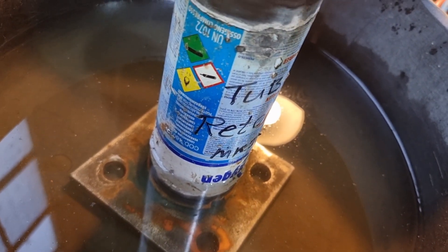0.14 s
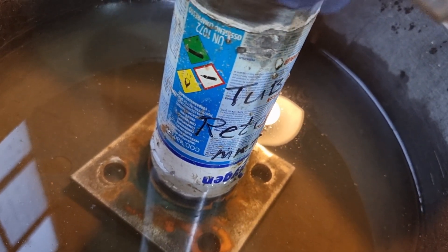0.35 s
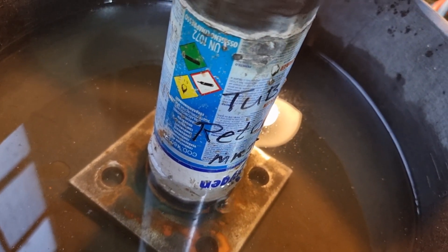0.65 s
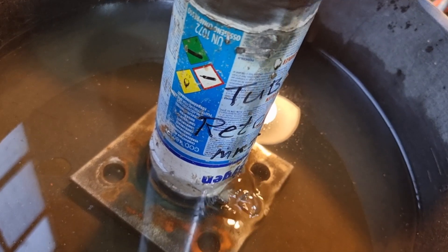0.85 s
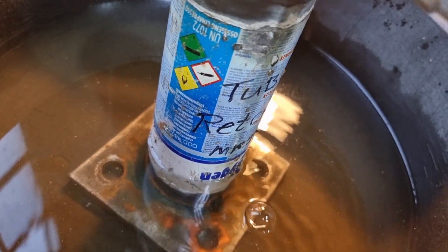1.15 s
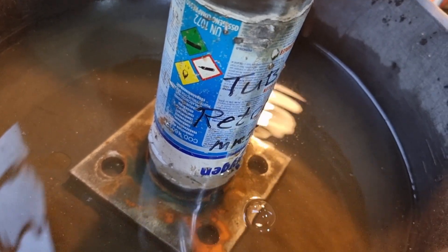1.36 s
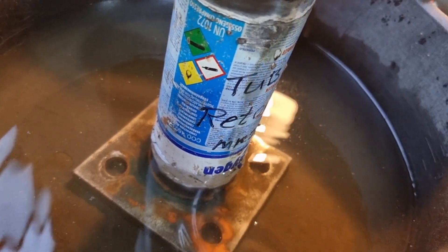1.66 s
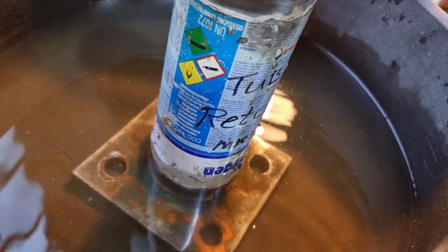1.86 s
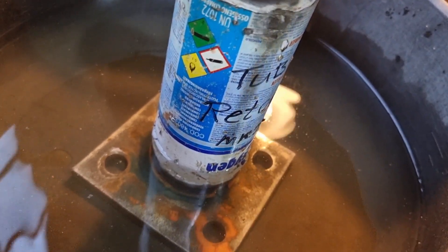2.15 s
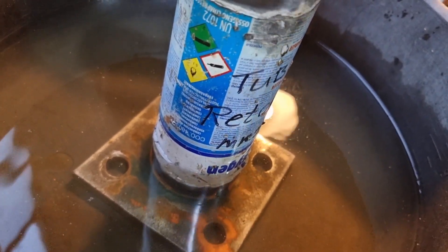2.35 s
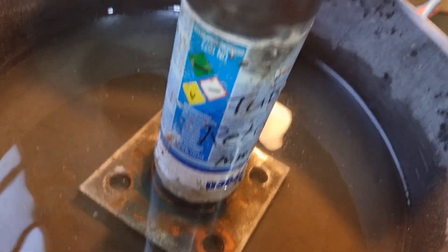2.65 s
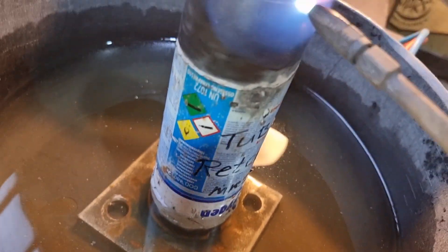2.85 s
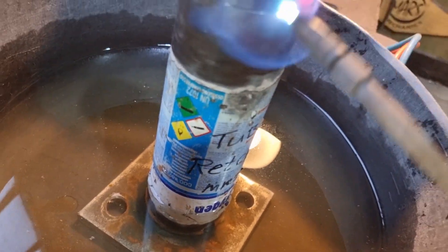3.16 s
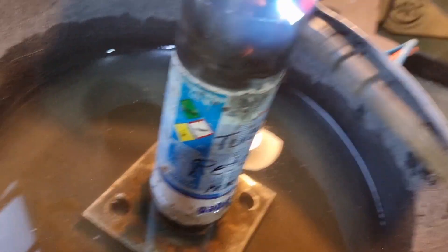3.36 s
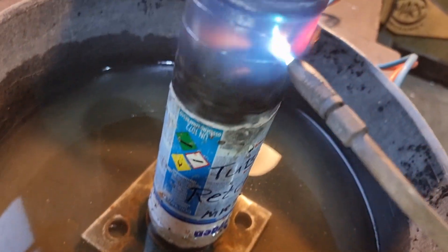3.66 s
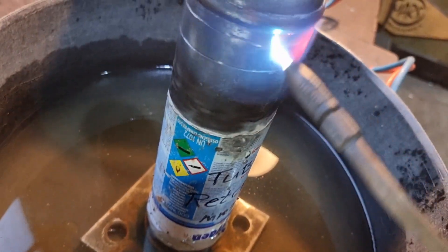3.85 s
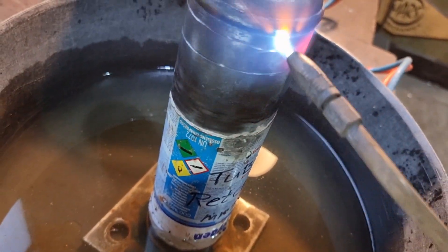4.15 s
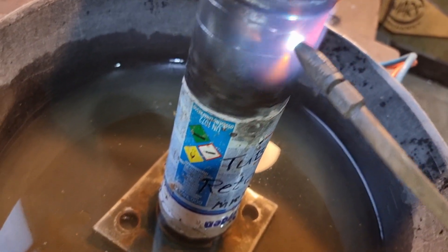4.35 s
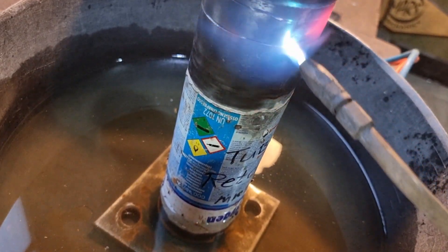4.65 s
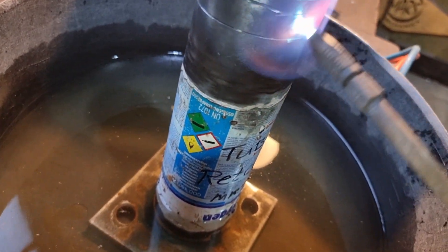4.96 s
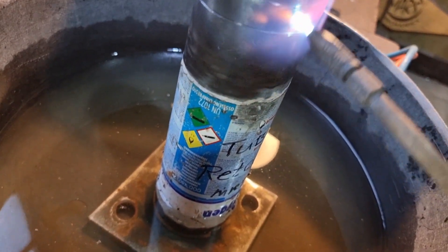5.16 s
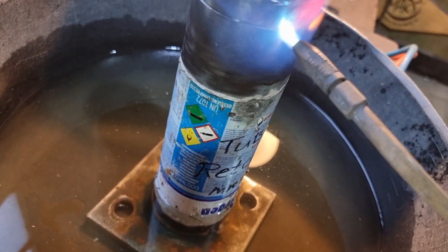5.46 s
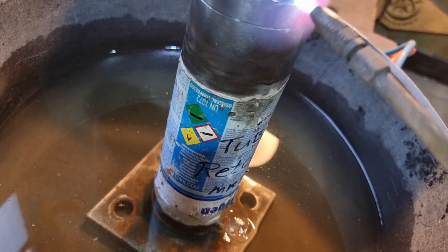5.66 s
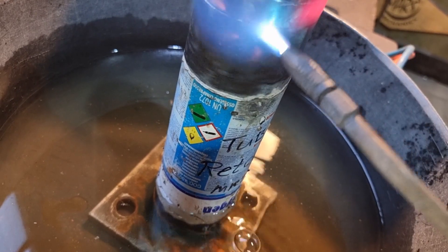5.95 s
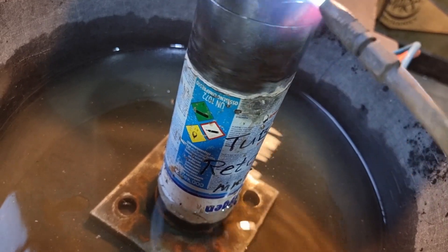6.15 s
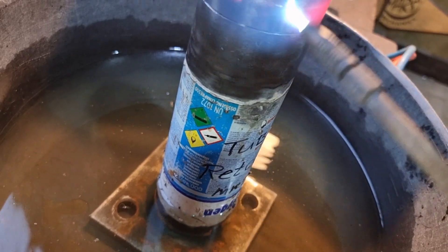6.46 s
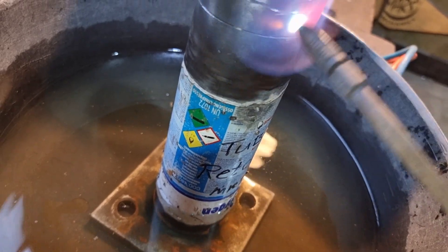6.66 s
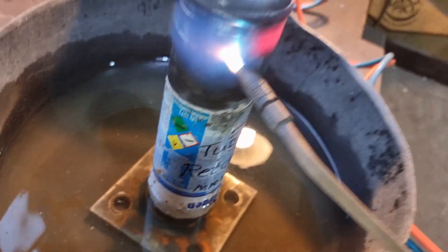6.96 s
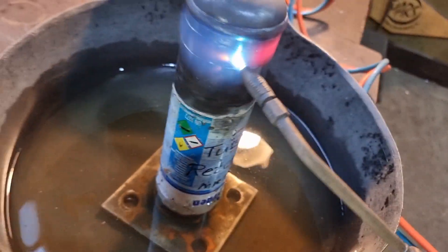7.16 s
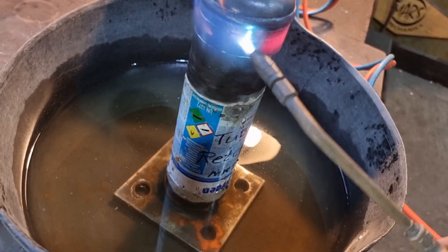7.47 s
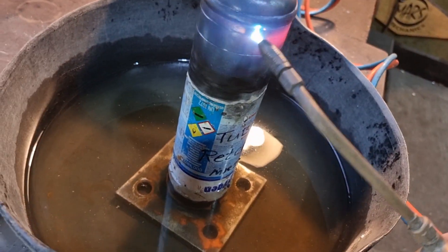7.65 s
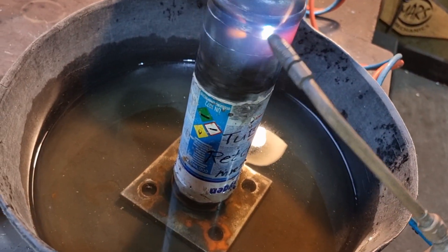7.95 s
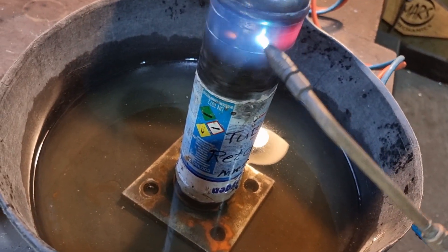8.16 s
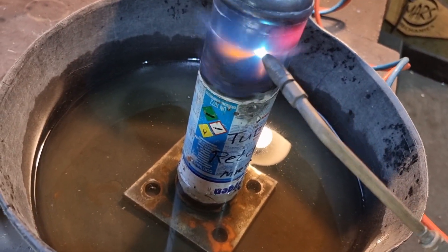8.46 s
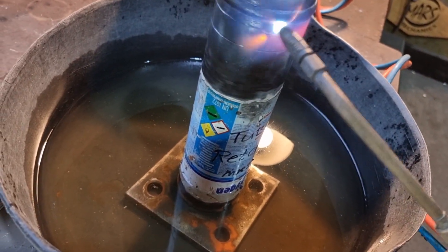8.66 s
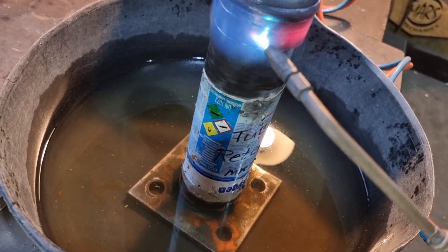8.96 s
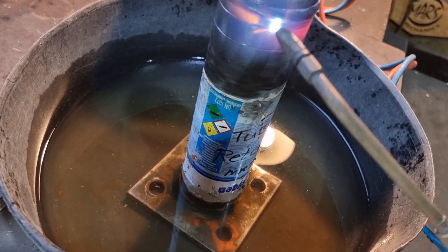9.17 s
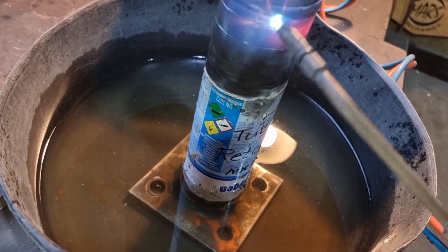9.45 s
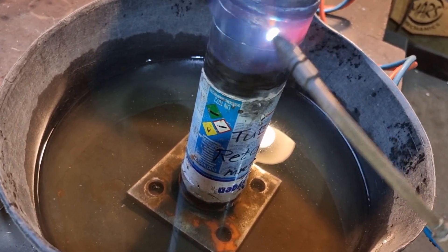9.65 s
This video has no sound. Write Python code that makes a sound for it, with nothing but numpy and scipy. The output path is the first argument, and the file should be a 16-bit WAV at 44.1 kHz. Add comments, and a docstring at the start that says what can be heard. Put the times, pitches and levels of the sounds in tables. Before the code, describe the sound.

Bright, gusty torch flame sweeps back and forth across metal, its piercing hiss swelling and sinking, interrupted once by a sharp double backfire.

```python
"""First comes a gas torch's roar, an arm's length from a phone's two microphones, sweeping over a steel tube
that stands in a tub of water. Flickering noise bands make its roar, gusty whistle and hiss, which mostly sink at
each turn of the hand. A short squeal glides up; a double backfire is gated noise with sharp bangs.
Two close echoes and a spray of short ones colour the torch. Behind it lie a fading rumble, a murmur of the
surroundings, faint sine hums and soft thumps."""
import sys
import numpy as np
from scipy import signal
from scipy.fft import rfft, irfft, next_fast_len
from scipy.io import wavfile
from scipy.ndimage import uniform_filter1d, minimum_filter1d, map_coordinates

SR = 44100
rng = np.random.default_rng(int(sys.argv[2]) if len(sys.argv) > 2 else 0)


def wav_record(signal):
    """Record a signal, one row per channel, as 16-bit PCM in the file named by sys.argv[1]."""
    frames = np.transpose(np.atleast_2d(signal))
    bounded = np.clip(frames, -1, 1)
    # unit amplitude maps onto the largest positive 16-bit level
    quanta = np.round(bounded * 32767).astype(np.int16)
    wavfile.write(sys.argv[1], SR, quanta)


N = 432621  # samples, 9.81 s

# Colour of the roar: (frequency [Hz], relative level [dB per Hz])
ROAR_COLOUR = [(300, -31), (860, -23.5), (1350, -17), (1850, -13), (2060, -19.5), (2350, -8), (3500, -6.5),
               (5000, -1.5), (6000, 2.5), (7500, -24), (9000, -61)]
UPPER_HZ = 4330  # where the upper roar begins


def roar(flutter, sputter):
    """Broad turbulence noise of the flame, parted into a lower and an upper roar."""
    whole = noise(ROAR_COLOUR, 2.57, 40., slow_db=0.7, count=9, channels=3)
    whole = unit(whole * undb(0.28 * flutter + 0.17 * sputter))
    lower = filtered(whole, 2, UPPER_HZ)
    return lower, whole - lower


# Colour of the whistling band: (frequency [Hz], relative level [dB per Hz])
WHISTLE_COLOUR = [(5900, -12), (6600, 1), (7600, 2.5), (8300, 3.5), (10000, -10)]
# Three ridges in the whistle, by how the nozzle points: (time [s], low [dB], middle [dB], high [dB])
RIDGE_LEVELS = [(0, 1, -2.5, 2), (3.3, -5, -7.5, -0.5), (3.75, -1.5, -9, -18), (4.1, -5, -7.5, -19),
                (5, -5, -5, -5), (6.9, -2.5, -7, -13.5), (7.4, -10, -1, -10), (9.81, -5.5, 0.5, 3)]
# Mean pitch of the low, middle and high ridge: (frequency [Hz])
RIDGE_PITCHES = (6876, 7530, 8000)
RIDGE_WANDER_HZ, RIDGE_WANDER_RATE, RIDGE_WIDTH_HZ = 110, 6, 620  # spread, turns a second, noise rate


def whistle(flutter, sputter):
    """A sputtering band of noise, with three wandering narrow ridges in the core of the flame."""
    band = noise(WHISTLE_COLOUR, 3.3, 70., count=3, channels=3)
    for hz, db in zip(RIDGE_PITCHES, curves(RIDGE_LEVELS)):
        level = undb(db + 3.8 * walk(110))
        wandering_hz = hz + RIDGE_WANDER_HZ * walk(RIDGE_WANDER_RATE)
        band[0] += level * narrow(wandering_hz, RIDGE_WIDTH_HZ)
    # gusts of a few milliseconds
    return unit(band * undb(0.6 * flutter + 1.2 * sputter + 1.76 * walk(150)))


# Colour of the hiss: (frequency [Hz], relative level [dB per Hz])
HISS_COLOUR = [(6000, -46), (8500, -20), (9700, -5), (11200, -4), (12700, 2), (14000, 1), (15500, 2.5),
               (17000, -21)]


def hiss(flutter, sputter):
    """High noise of the escaping gas, flickering in three bands."""
    bands = noise(HISS_COLOUR, 1.3, 85., slow_db=2.5, count=3, channels=3)
    return unit(bands * undb(.5 * flutter + 0.093 * sputter + 1.0 * walk(150)))


# Coming back onto the tube in a wide sweep: (middle time [s], level at the top of the flare [dB])
FLARE_TIMES = [(0.03, -28), (0.421, -20), (0.86, -21), (1.31, -18), (1.771, -22), (2.18, -27), (2.64, -30),
               (4.34, -23)]
FLARE_S, FLARE_HZ, FLARE_GLIDE_HZ, FLARE_WIDTH_HZ = 0.105, 11320, 1990, 2700


def flares():
    """Brief flares of hiss: a narrow noise band that swells while gliding up."""
    strength = sum(undb(db) * swell(s, FLARE_S) for s, db in FLARE_TIMES)
    glide = sum(span(s - FLARE_S / 2, FLARE_S, lambda u: u - .5) for s, _ in FLARE_TIMES)
    return strength * unit(narrow(FLARE_HZ + FLARE_GLIDE_HZ * glide, FLARE_WIDTH_HZ))


# The flame full on the tube: (time [s], roar level [dB], whistle level [dB], hiss level [dB])
FLAME_LEVELS = [(0.0, -31.5, -26, -17), (1.4, -26.5, -17, -19.5), (3.0, -33, -21.5, -17),
                (3.4, -29.5, -21, -18.5), (5.5, -29.5, -19.5, -16), (7.0, -26.5, -16.5, -22),
                (9.81, -27.5, -23, -17.5)]
# Turns of the hand, with how far each part sinks (negative: rises):
# (middle time [s], length [s], roar [dB], whistle [dB], hiss [dB])
HAND_TURNS = [(0.281, 0.66, 5, 7, 6.5), (0.722, 0.52, 8, 10.5, 3), (1.191, 0.52, 6.5, 12, 3),
              (1.61, 0.54, 11, 15, 5), (2.067, 0.43, 14.5, 16, 11.5), (2.453, 0.46, 11.5, 13.5, 13.5),
              (2.848, 0.33, 13.5, 15.5, 11.5), (3.179, 0.23, 7.5, 9.5, 3.5), (3.416, 0.58, -1.5, -3, 4),
              (3.84, 0.42, -1, 1, 5), (4.139, 0.48, -1, -1.5, 4.5), (4.44, 0.5, 8.5, 9, 4),
              (4.88, 0.45, 0.2, -0.5, 11), (5.382, 0.23, -1, -1, 8.5), (5.709, 0.48, -2, 2, 4),
              (6.148, 0.55, -2, 3, 6.5), (6.552, 0.34, -1.5, 6, 2), (6.755, 0.24, 10.5, 9, -1),
              (7.152, 0.57, 2.5, 5.5, 0), (7.466, 0.41, 2.5, 6, -0.5), (7.766, 0.66, 2, 3, -1.5),
              (8.061, 0.31, 11.5, 8.5, 0), (8.467, 0.48, 11.5, 11.5, 1), (8.825, 0.44, 16, 12, 4.5),
              (9.299, 0.35, 9, 8.5, 1.5), (9.714, 0.41, 11.5, 8, 3.5)]
HISS_LEAD_S = 0.023  # the hiss sinks a little before the roar
UPPER_LENGTH_SHARE, UPPER_LATE_S = 0.98, 0.012  # the upper roar turns more briefly and a little later


def sweeps():
    """Levels in dB of lower roar, upper roar, whistle and hiss as the hand sweeps and turns."""
    lower_level, whistle_level, hiss_level = curves(FLAME_LEVELS)
    upper_level = lower_level
    for middle, length, roar_db, whistle_db, hiss_db in HAND_TURNS:
        away = dip(middle, length)
        lower_level = lower_level - roar_db * away
        whistle_level = whistle_level - whistle_db * away
        upper_level = upper_level - roar_db * dip(middle + UPPER_LATE_S, UPPER_LENGTH_SHARE * length)
        hiss_level = hiss_level - hiss_db * dip(middle - HISS_LEAD_S, length)
    return lower_level, upper_level, whistle_level, hiss_level


FIRM, RETURN_SHARE = 0.64, 0.48  # flatness of the dip; share of its length that the way back takes


def dip(middle, length):
    """A turn of the hand from 0 to 1 and back: flattened in the middle, the way back of its own length."""
    def shape(u):
        bent = np.interp(u, [0, 1 - RETURN_SHARE, 1], [0, .5, 1])
        return np.tanh(FIRM * np.sin(np.pi * bent) ** 2) / np.tanh(FIRM)
    return span(middle - length / 2, length, shape)


# The jet choked around the backfire: (time [s], roar change [dB], whistle change [dB], hiss change [dB])
CHOKE_LEVELS = [(4.47, 0, 0, 0), (4.52, -3, -6, -8), (4.547, -5, -8, -11), (4.551, -6, -12, -24),
                (4.575, -6, -12, -22), (4.612, -8, -16, -14), (4.64, -9, -18, -7), (4.66, -6, -11, -5),
                (4.71, 0, 0, 0)]
# Gas spread round the tube, unrelated at the two microphones, against the core:
# (lower roar [dB], upper roar [dB], whistle [dB], hiss [dB])
SPREAD_LEVELS = (-8.5, -8.5, -5, -4.5)


def jet():
    """Rows: the core of the flame, then the gas spread round the tube at the left and right microphone."""
    flutter, sputter = walk(95), walk(170)  # shared by all parts
    parts = *roar(flutter, sputter), whistle(flutter, sputter), hiss(flutter, sputter)
    choke = curves(CHOKE_LEVELS)
    choke = choke[:1] + choke  # both roars share a column
    flame = 0
    for part, level_db, choke_db, spread_db in zip(parts, sweeps(), choke, SPREAD_LEVELS):
        flame = flame + part * undb(level_db + choke_db) * undb([[0], [spread_db], [spread_db]])
    flame[0] += flares()
    return flame


# Spans of crackling burn, levels before the crackle:
# (start time [s], length [s], burn level [dB], sizzle level [dB])
BACKFIRE_SPANS = [(4.522, .013, -35, -36), (4.5362, .002, -9, -14), (4.538, .007, -22, -19),
                  (4.546, .003, -25, -12), (4.549, .003, -33, -34), (4.556, .018, -37, -42),
                  (4.572, .006, -30, -32), (4.578, .006, -20, -21), (4.5845, .004, -13, -11),
                  (4.5885, .007, -17, -14), (4.595, .012, -11, -14), (4.608, .002, -18, -24),
                  (4.61, .005, -26, -30), (4.615, .008, -34, -42)]
# Colour of the burn: (frequency [Hz], relative level [dB per Hz])
BURN_COLOUR = [(300, -16), (700, -18), (1400, -7), (3000, 0.5), (6500, -0.5), (9000, -7), (17000, -4.5)]
# Colour of the sizzle: (frequency [Hz], relative level [dB per Hz])
SIZZLE_COLOUR = [(3000, -30), (4500, -3), (7000, 9), (9700, -8), (12700, -1), (15500, -2), (17000, -10)]
# Bangs within the backfire: (start time [s], frequency [Hz], length [cycles], level [dB])
BANGS = [(4.5364, 1400, 2.2, -10), (4.5366, 5000, 2, -7), (4.537, 7500, 3, -10), (4.5852, 3000, 1.5, -7),
         (4.588, 700, 1.5, -26), (4.6018, 3000, 1.5, -7), (4.608, 1400, 1.7, -13), (4.6086, 4000, 1.2, -7)]


def backfire():
    """Ragged flat-topped bursts of burning noise, with bangs that are short swings of pressure."""
    gate = 0
    for start, length, *db in BACKFIRE_SPANS:
        whole = length + .01  # room for the decay

        def burst(u):
            rise = np.clip(u * whole / .0004, 0, 1)
            return rise * np.exp(-np.clip(u * whole - length, 0, 1) / .001)
        gate = np.maximum(gate, undb(db)[:, None] * span(start, whole, burst))
    burn = gate[0] * noise(BURN_COLOUR, 1.5, 150., count=2)[0] + gate[1] * noise(SIZZLE_COLOUR)[0]
    bangs = 0
    for start, hz, cycles, db in BANGS:
        def swings(u):
            return np.sin(2 * np.pi * cycles * u) * np.sin(np.pi * u) ** 2
        bangs = bangs + undb(db) * span(start, cycles / hz, swings)
    crackle = undb(4.5 * walk(2500) - 2)
    return burn * crackle + bangs


# A short rising squeal of the jet: (start time [s], length [s], from [Hz], to [Hz], level [dB])
JET_SQUEAL = (2.443, .03, 7400, 7900, -19)


def squeal():
    """A sine that swells and fades while its pitch glides up."""
    start, length, hz0, hz1, db = JET_SQUEAL

    def glide(u):
        cycles = length * (hz0 * u + (hz1 - hz0) * u ** 2 / 2)
        return np.sin(np.pi * u) ** 2 * np.sin(2 * np.pi * cycles)
    return undb(db) * span(start, length, glide)


# Where the torch is, and its two echoes before their wavering: (time [s], left leads by [ms],
# left minus right [dB], near echo delay [ms], its level [dB], far echo delay [ms], its level [dB])
TORCH_PLACE = [(0, 0.068, 1, 0.71, -7, 2.4, -31), (3.3, 0.08, 2.5, 0.72, -10.5, 0.88, -21),
               (3.9, 0.083, 2.5, 0.93, -10, 1.35, -39), (4.5, 0.083, 1.5, 0.8, -8, 1.45, -7),
               (5, 0.053, 2, 0.84, -12, 1.52, -12), (6.8, 0.081, 2.5, 0.814, -17, 1.39, -35),
               (7.4, 0.039, 1.5, 0.61, -21, 1.3, -40), (9.81, 0.04, 2.1, 0.77, -21, 1.46, -25)]
ECHO_TOP_HZ = 11800
TUB_DB, BACKFIRE_TUB_DB = -5, -13  # echo spray; what the outbursts send into it


def space(flame, bursts):
    """Two close, duller echoes comb the core of the flame; their paths waver with the hand."""
    lead, pan_db, near, near_db, far, far_db = curves(TORCH_PLACE)
    core, ports = flame[0] + bursts, []
    dull = filtered(core, 1, ECHO_TOP_HZ)
    near, far = near + 0.022 * walk(4.01), far + 0.062 * walk(4.8)
    for side, spread in zip((1, -1), flame[1:]):  # left, right
        direct_ms = .1 - side * lead / 2
        near_echo = undb(near_db) * late(dull, direct_ms + near + side * 0.016)
        far_echo = undb(far_db) * late(dull, direct_ms + far + side * 0.032)
        spray = undb(TUB_DB) * tub(flame[0] + undb(BACKFIRE_TUB_DB) * bursts)
        heard = late(core, direct_ms) + near_echo + far_echo + spray + spread
        ports.append(heard * undb(side * pan_db / 2 - 2.5))
    return np.array(ports)


def late(x, ms):
    """The sound heard through a path whose length changes."""
    return map_coordinates(x, [np.arange(N) - ms * SR / 1000], order=3, mode="mirror")


TUB_T60_S = .02  # time in which the spray falls by 60 dB


def tub(x):
    """A spray of short echoes whose pattern changes as the torch moves: three patterns fade in and out."""
    t = np.arange(2048) / SR
    fade_in = np.clip((t - .001) / 0.0039, 0, 1)
    tails = rng.standard_normal((3, len(t))) * undb(-60 * t / TUB_T60_S) * fade_in
    shares = np.array([walk(3.5) for _ in tails])
    shares /= np.sqrt(np.sum(shares ** 2, axis=0))
    return sum(w * signal.oaconvolve(x, h / np.sqrt(np.sum(h ** 2)))[:N] for w, h in zip(shares, tails))


WIDE_UNTIL_S = 3.3  # the first sweeps are wide
SWING_DB, SWING_LATE_S, SWING_ABOVE_HZ = 15, 0.034, 13300


def swing(ports):
    """The treble leans to the right microphone at each turn of a wide sweep."""
    away = sum(swell(s + SWING_LATE_S, length) for s, length, *_ in HAND_TURNS if s < WIDE_UNTIL_S)
    treble = filtered(ports, 3, SWING_ABOVE_HZ, "high")
    return ports + treble * (undb(SWING_DB * away * np.array([[-.5], [.5]])) - 1)


# The backfire pushes the air: (middle time [s], length [s], level [dB])
AIR_PUSH = (4.585, .08, -50)
# Colour of that push: (frequency [Hz], relative level [dB per Hz])
AIR_PUSH_COLOUR = [(30, -6), (60, 0), (150, -3), (300, 3), (500, -18)]


def whump():
    """A brief swell of low noise, alike at both microphones."""
    middle, length, db = AIR_PUSH
    return undb(db) * swell(middle, length) * noise(AIR_PUSH_COLOUR)


# Soft thumps, before the left/right offset: (time [s], level [dB])
THUMP_TIMES = [(0.415, -40), (0.942, -40), (1.033, -41), (1.802, -36), (1.93, -44), (2.199, -41),
               (2.647, -48), (2.999, -42), (3.313, -40), (3.741, -38), (4.038, -43), (4.398, -38),
               (4.868, -42), (5.005, -48), (5.619, -44), (6.004, -41), (6.31, -45), (6.893, -45)]


def thumps():
    """Each thump is one short push of pressure that sags back, stronger at the left microphone."""
    out, t = np.zeros((2, N)), np.arange(2048) / SR
    push = unit(t * np.exp(-t / 0.001) - 0.04 * t * np.exp(-t / 0.005))
    for s, db in THUMP_TIMES:
        i = int(s * SR)
        out[:, i:i + len(t)] += undb(db + np.array([[2], [-8]])) * push / push.max()
    return out


# A wavering hum like a far motor, before its flicker: (time [s], frequency [Hz], level [dB])
MOTOR_HUM = [(1.1, 133, -73), (2, 138, -68), (2.9, 140.3, -66), (3.17, 128, -64), (3.35, 122, -52),
             (3.5, 114, -53), (3.75, 108, -60), (4.25, 113.4, -57), (4.35, 114.3, -67), (4.9, 115.4, -62),
             (5.1, 116.3, -72), (5.4, 118.2, -52), (5.7, 121, -64.5), (6.1, 124.4, -71)]


def motor():
    """A sine whose pitch and level waver, faded at both ends."""
    first, last = MOTOR_HUM[0], MOTOR_HUM[-1]
    hz, db = curves([(first[0] - .2, first[1], -90), *MOTOR_HUM, (last[0] + 0.18, last[1], -90)])
    return np.sqrt(2) * np.sin(2 * np.pi * np.cumsum(hz) / SR) * undb(db + 1.2 * walk(8.8))


# Swells of the low hums, before the flicker and the left/right offset:
# (middle time [s], length [s], frequency [Hz], level at the top [dB])
LOW_HUMS = [(0.22, 0.97, 45.4, -49), (0.68, .5, 64, -57), (1, .5, 45, -65), (1.8, 1.2, 45, -53.5),
            (1.75, 1, 67, -59), (2.65, .6, 70, -59), (2.8, 0.55, 47, -57), (3.2, .3, 44, -57)]


def low_hums():
    """Low sines that swell and fade with a shared flicker, a little louder on the left."""
    time = np.arange(N) / SR
    hum = sum(undb(db) * swell(s, length) * np.sin(2 * np.pi * f * time) for s, length, f, db in LOW_HUMS)
    return np.sqrt(2) * hum * undb(1.2 * walk(8) + np.array([[1.5], [-1.5]]))


# The rumble fades away, before the left/right offset: (time [s], level [dB])
RUMBLE_LEVEL = [(0, -56), (1.2, -58), (2.2, -58.5), (3.2, -58), (5.4, -59.5), (6.3, -63.5), (9.81, -67)]
# Colour of the rumble: (frequency [Hz], relative level [dB per Hz])
RUMBLE_COLOUR = [(20, -13), (40, -3.5), (70, -1.5), (120, -2.5), (200, -7), (300, -16)]


def rumble():
    """Low flickering noise that the microphones mostly share."""
    mid, side = noise(RUMBLE_COLOUR, 2.2, 10., count=3, channels=2)
    level = undb(curves(RUMBLE_LEVEL)[0] + np.array([[1.2], [-1.2]]))
    return level * (mid + .6 * side * np.array([[1], [-1]]))


# Colour of the surroundings: (frequency [Hz], relative level [dB per Hz])
YARD_COLOUR = [(100, -30), (200, 1), (400, 1), (520, -6.5), (640, 1.5), (900, -7), (1500, -4.5),
               (2100, -13), (3000, -16), (5000, -29)]
YARD_DB = -56.5


def murmur():
    """A wide murmur of the surroundings: unrelated noise at the two microphones."""
    return undb(YARD_DB) * noise(YARD_COLOUR, 3.2, 12.0, count=3, channels=2)


def undb(db):
    """Amplitude factor of a level in dB."""
    return 10 ** (np.asarray(db) / 20)


def unit(x):
    """The signal scaled to rms 1."""
    return x / np.sqrt(np.mean(x ** 2))


def filtered(x, order, hz, kind="low"):
    """The part below (or above) a pitch, without delay."""
    return signal.sosfiltfilt(signal.butter(order, hz, kind, fs=SR, output="sos"), x)


def curves(table):
    """Columns of a table joined by straight lines in time."""
    s, *columns = np.transpose(table)
    return [np.interp(np.arange(N) / SR, s, c) for c in columns]


def walk(rate):
    """Random levels, rate a second, joined by straight lines; rms 1."""
    knots = rng.standard_normal(int(N / SR * rate) + 2)
    return unit(np.interp(np.arange(N) * rate / SR, np.arange(len(knots)), knots))


def noise(colour, own_db=0., rate=15., slow_db=0., count=1, channels=1):
    """Noises of one colour, cut into bands that each flicker alone; rms 1."""
    size = next_fast_len(N)
    f = np.log(np.arange(1, size // 2 + 2) * SR / size)
    at, db = np.log(np.transpose(colour)[0]), np.transpose(colour)[1]
    shape = undb(np.interp(f, at, db, left=-99, right=-99))
    whole = rfft(rng.standard_normal((channels, size))) * shape
    # overlapping triangular bands, evenly spaced in log frequency
    place = np.clip((f - at[0]) / (at[-1] - at[0]) * count - .5, 0, count - 1)
    total = 0
    for k in range(count):
        band = irfft(whole * np.clip(1 - abs(place - k), 0, 1), size)[:, :N]
        total = total + band * undb(own_db * walk(rate) + slow_db * walk(5.4))
    return unit(total)


def narrow(hz, width_hz):
    """A narrow band of noise whose centre may move."""
    turn = 2 * np.pi * np.cumsum(hz) / SR
    return walk(width_hz) * np.cos(turn) + walk(width_hz) * np.sin(turn)


def swell(middle, length):
    """A smooth rise and fall from 0 to 1 and back."""
    return span(middle - length / 2, length, lambda u: np.sin(np.pi * u) ** 2)


def span(start, length, shape):
    """Silence, but for a shape of the place 0-1 within one stretch of time."""
    out = np.zeros(N)
    i = np.arange(max(int(start * SR), 0), min(int((start + length) * SR) + 1, N))
    out[i] = shape(np.clip((i / SR - start) / length, 0, 1))
    return out


def scene():
    """The torch at arm's length, with the background behind it."""
    torch = swing(space(jet(), backfire() + squeal()))
    return torch + whump() + thumps() + motor() + low_hums() + rumble() + murmur()


# The two microphones differ in colour: (frequency [Hz], left minus right [dB])
MICROPHONES = [(300, -1), (1000, 0), (4000, -1.5), (7500, -1.5), (10000, -5.5), (12000, 1), (16000, 4)]
CEILING, LIMIT_SAMPLES, TOP_HZ = .8, 129, 15710  # limiter amplitude and window; top cut


def record(dry):
    """The microphones colour the sound unequally; a limiter holds loud peaks and the top is cut steeply."""
    size = next_fast_len(N)
    hz, db = np.transpose(MICROPHONES)
    tilt_db = np.interp(np.log(np.arange(1, size // 2 + 2) * SR / size), np.log(hz), db)
    heard = irfft(rfft(dry, size) * undb(np.array([tilt_db, -tilt_db]) / 2), size)[:, :N]
    room = CEILING / np.maximum(abs(heard).max(axis=0), CEILING)
    gain = uniform_filter1d(minimum_filter1d(room, LIMIT_SAMPLES), LIMIT_SAMPLES)
    top_cut = signal.ellip(16, .3, 90, TOP_HZ, fs=SR, output="sos")
    return signal.sosfilt(top_cut, heard * gain)


dry = scene()
out = record(dry)
wav_record(out)
```